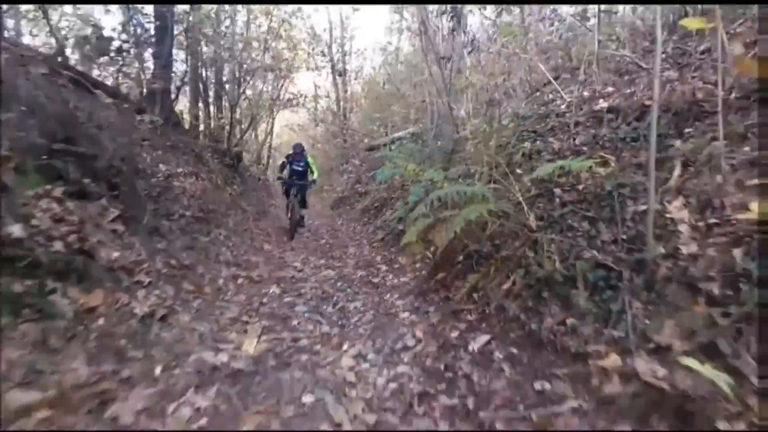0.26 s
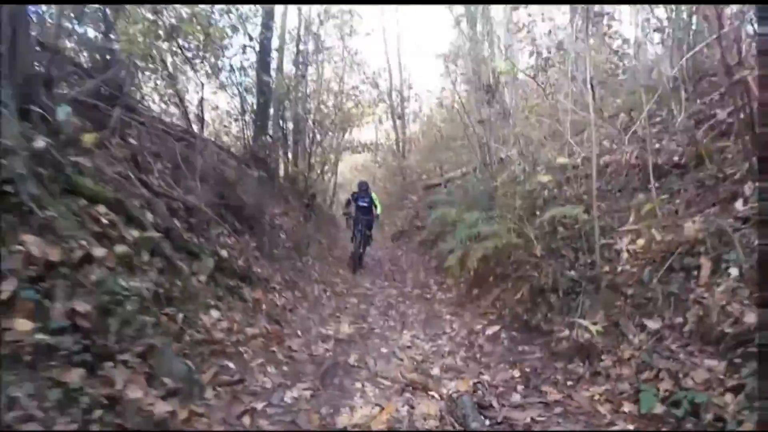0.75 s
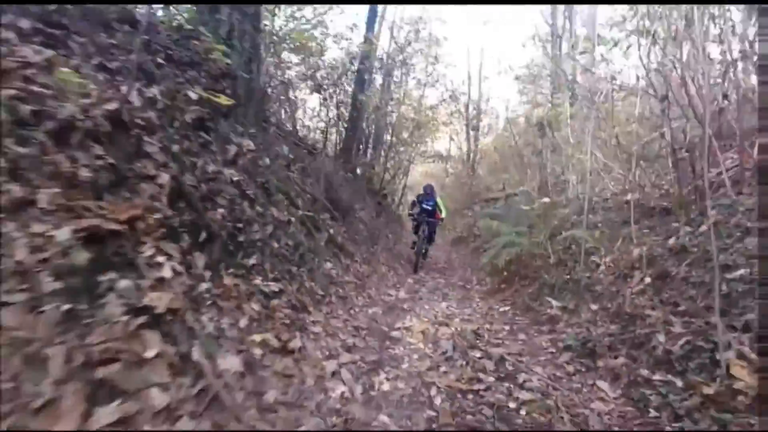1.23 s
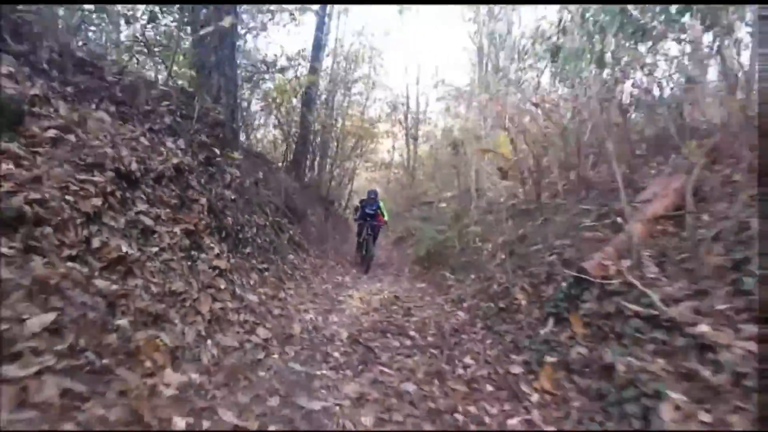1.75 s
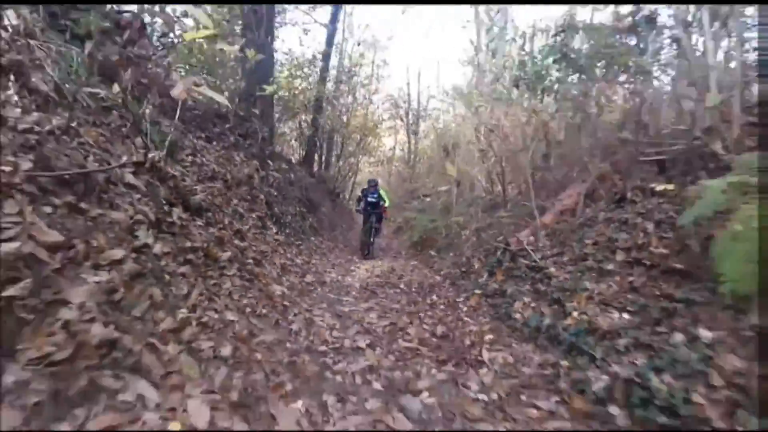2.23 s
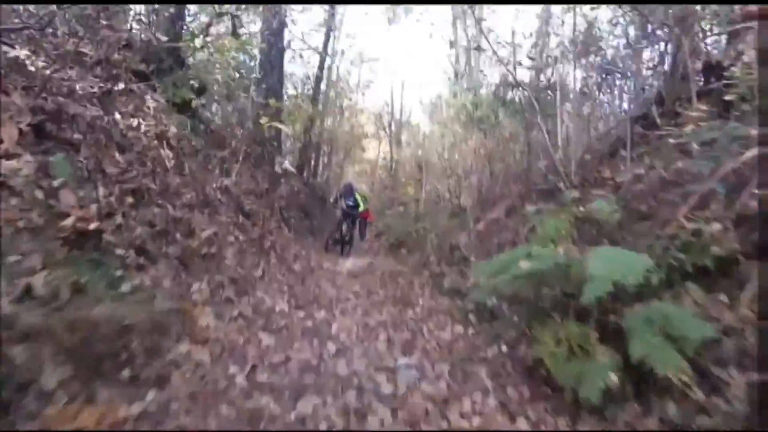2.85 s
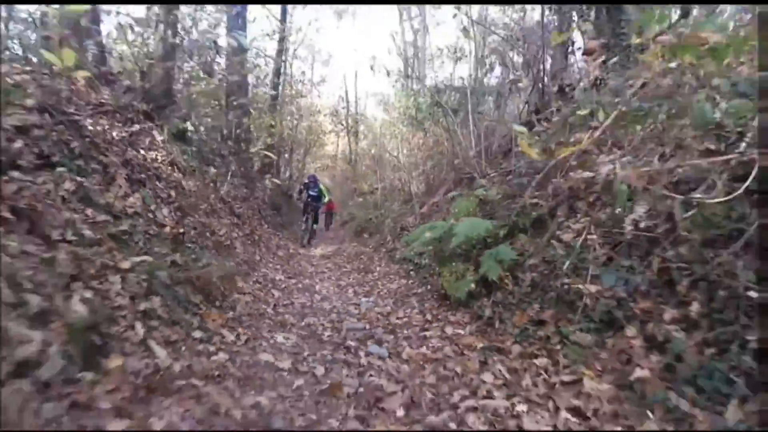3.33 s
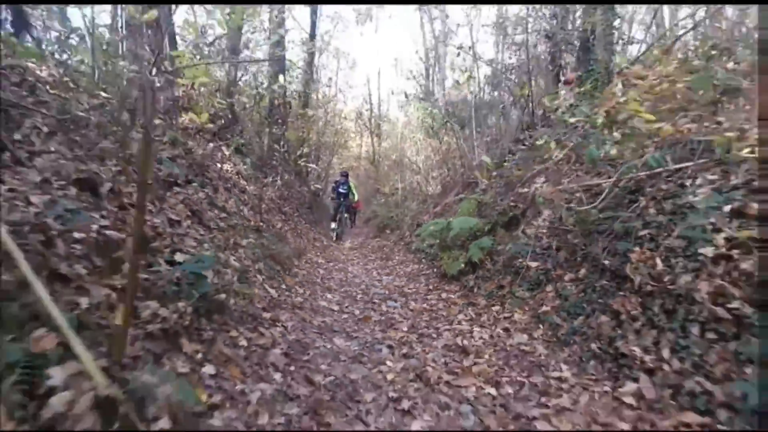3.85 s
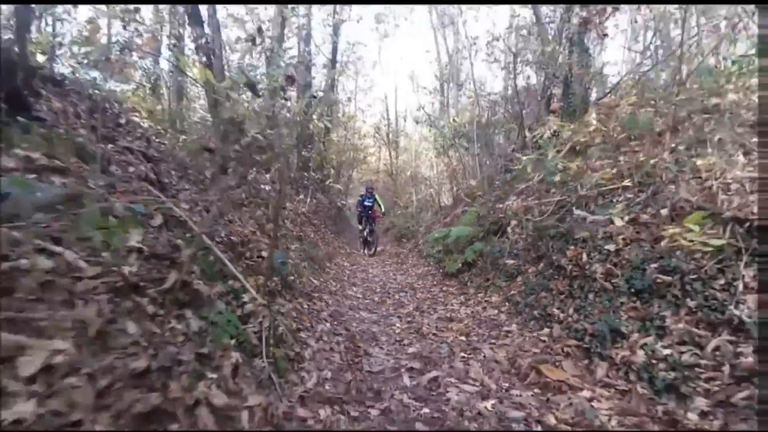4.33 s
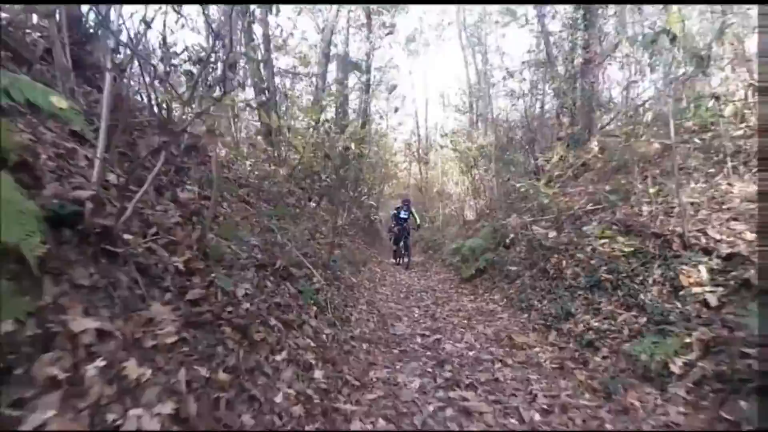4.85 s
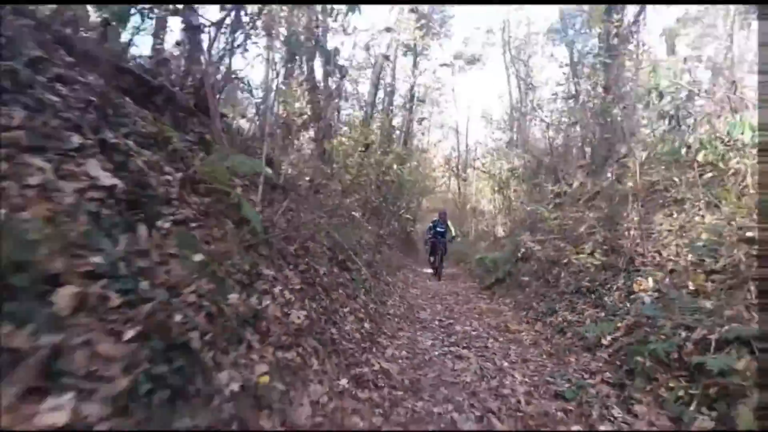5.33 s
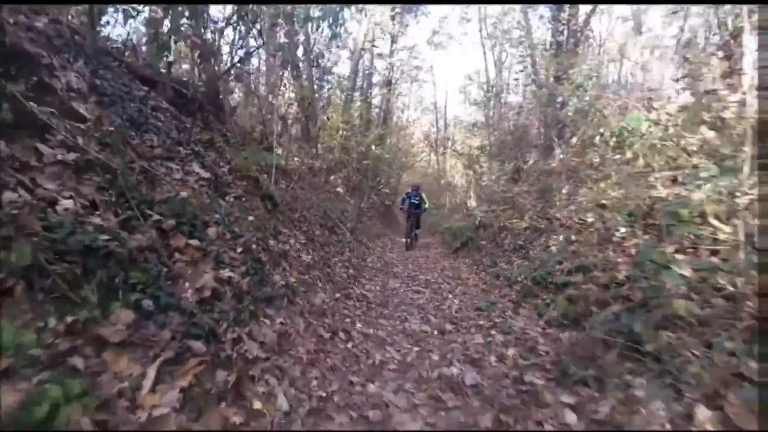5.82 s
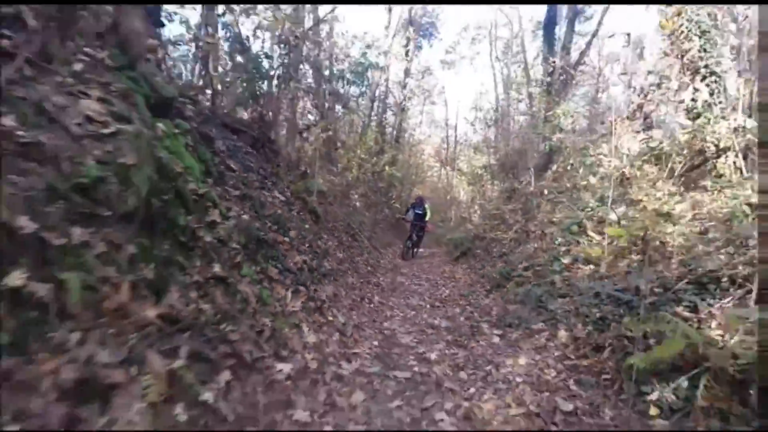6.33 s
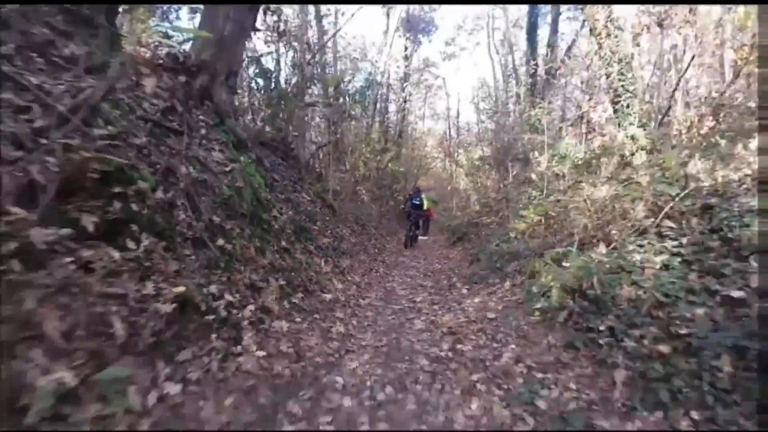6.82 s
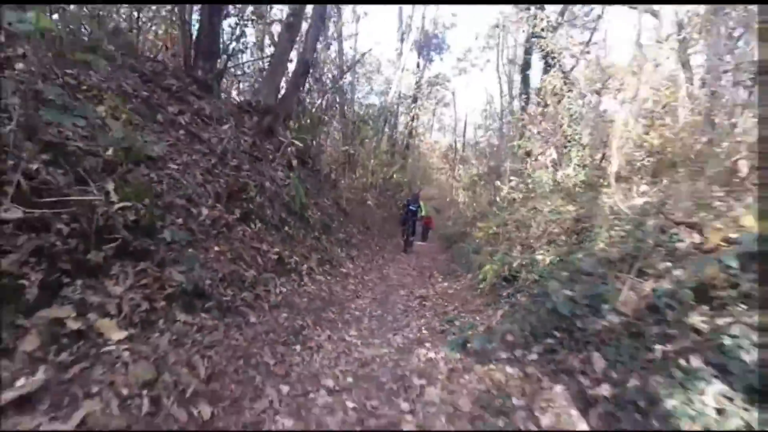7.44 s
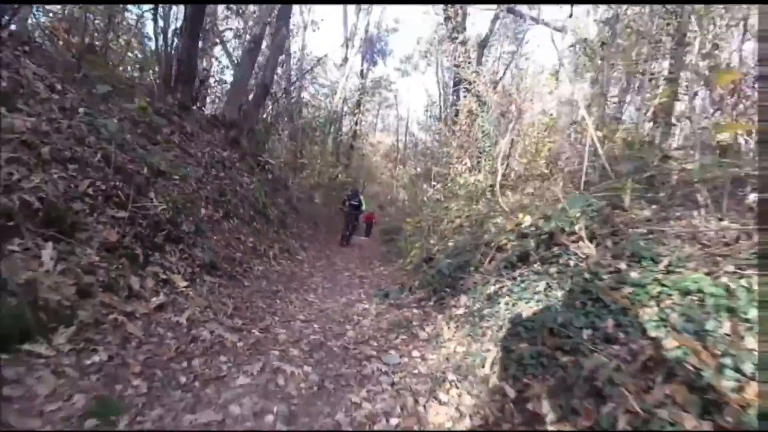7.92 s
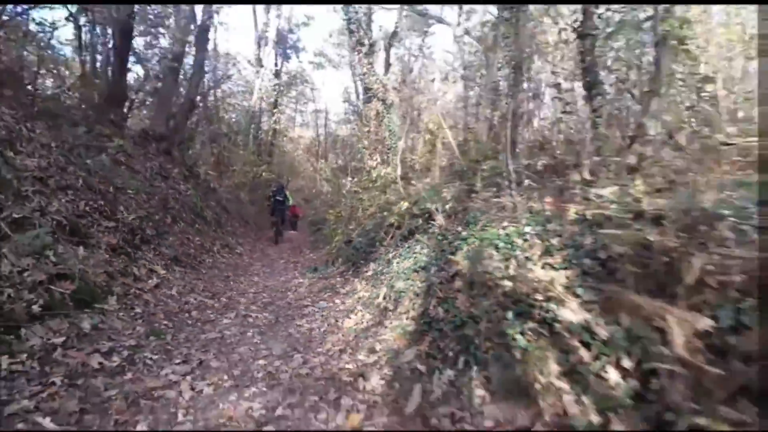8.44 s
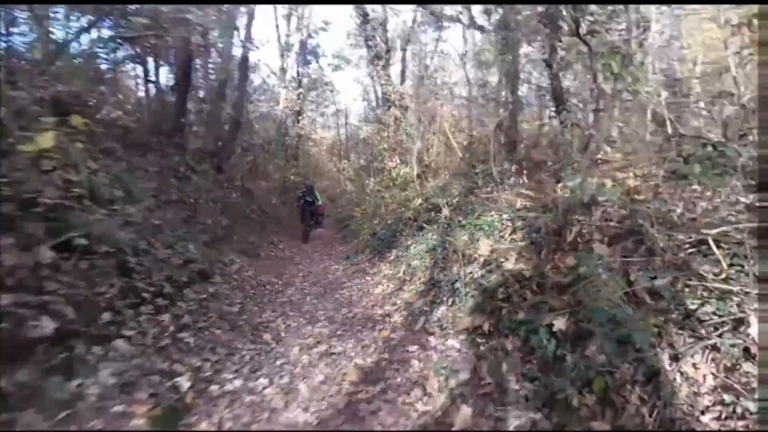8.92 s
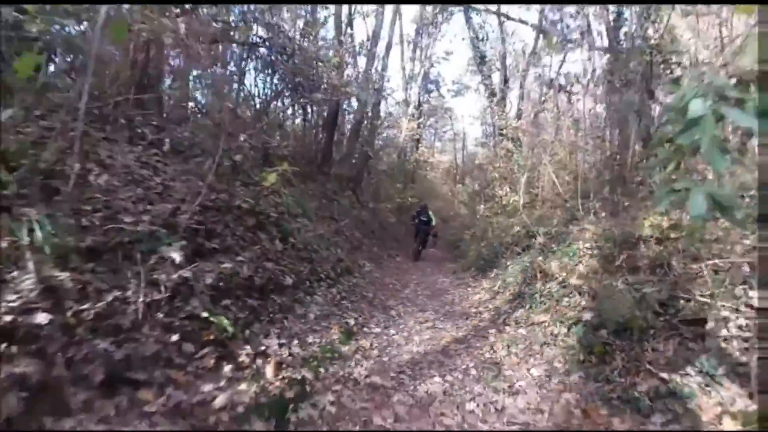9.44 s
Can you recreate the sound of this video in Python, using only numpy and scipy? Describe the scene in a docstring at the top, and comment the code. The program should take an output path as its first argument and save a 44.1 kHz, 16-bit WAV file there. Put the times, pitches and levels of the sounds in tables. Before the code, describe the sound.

Muffled wind buffets a boxed-in microphone on a bicycle while hollow plastic knocks rattle irregularly and tyres crackle faintly through dry leaves.

```python
"""A camera in a closed plastic housing rides a bicycle along a leafy dirt trail in a wood.
It opens on a strong gust, made of lumpy low noise, over a flurry of knocks, each a ring of housing modes.
Further gusts peak near 2.1 and 3 s while the tyres hiss and crackle, as banded noise and clicks, in the leaves.
The steady wind sinks near 4.5 s under two hard knocks; then a stem rattles past in six even noise cracks.
Knocks, sine wind pops, snaps and scratchy brushes go on over drifts of leaves; the hiss swells at the end."""
import sys
import numpy as np
from scipy import signal
from scipy.io import wavfile
from scipy.ndimage import uniform_filter1d

SR = 44100
rng = np.random.default_rng(int(sys.argv[2]) if len(sys.argv) > 2 else 0)


def to_wav(s):
    """Save 16-bit WAV."""
    ch = np.atleast_2d(s).T  # columns
    pcm = np.round(np.clip(ch, -1, 1) * 32767)  # PCM
    wavfile.write(sys.argv[1], SR, pcm.astype(np.int16))


N = 426447

# steady air flow between gusts: (time [s], level [dB])
STEADY_WIND = [(0.0, -27.5), (0.9, -30.5), (1.9, -29), (2.8, -29.5), (3.55, -33.5), (4.55, -41.5),
               (5.3, -30.5), (6.3, -32), (7.6, -30), (8.04, -31.5), (8.7, -29.5), (9.0, -32), (9.6, -28.5)]
# gusts that buffet the port: (time of peak [s], peak level [dB], time to fall 10 dB [s])
GUSTS = [(0.0, -14.5, 0.0834), (0.14, -18, 0.224), (0.7, -19.5, 0.0553), (1.06, -20, 0.14), (1.46, -18, .3),
         (1.63, -20, 0.047), (1.81, -20.5, 0.1532), (2.121, -16, 0.0938), (2.3, -18, .15), (2.4, -17, 0.11),
         (2.72, -25, 0.27), (3.04, -14.5, 0.062), (3.25, -20, 0.23), (3.77, -20.5, 0.3436),
         (4.34, -25.5, 0.0429), (4.71, -23.5, .15), (4.89, -21, 0.137), (5.09, -25, 0.1357),
         (5.66, -18, 0.0782), (5.8, -19.5, 0.026), (6.05, -24, 0.18), (6.49, -19, 0.14), (6.61, -21, 0.035),
         (6.86, -20, 0.06), (7.03, -24.5, 0.11), (7.36, -20.5, 0.3226), (8.17, -24, .25), (8.47, -28, 0.18),
         (8.93, -23.5, 0.07), (9.18, -27.5, 0.25)]
GUST_RISE_S = 0.0794  # time to rise the last 10 dB
# spectrum of the flow at the port, before its band-passes: (frequency [Hz], density [dB per Hz])
WIND_COLOUR = [(20, -30), (60, -12), (110, -6), (158, -0.5), (212, -5), (262, -1.5), (400, -5.5),
               (560, -7.5), (800, -19), (1050, -23), (1500, -53)]

# low wind pops: (time [s], nominal level [dB], starting pitch [Hz])
WIND_POPS = [(0.133, -9.5, 376), (1.042, -10.5, 424), (1.322, -14.5, 206.4), (2.716, -11.5, 259),
             (1.424, -12, 256), (1.458, -4.5, 372), (1.618, -6.5, 251), (2.241, -11, 383),
             (2.323, -12.5, 277), (3.659, -14, 651), (3.761, -11, 195.7), (3.868, -15, 712),
             (4.888, -12.5, 212), (5.631, -15.5, 331), (6.852, -19.5, 247), (7.354, -10.5, 262),
             (7.673, -19, 460), (8.681, -17.5, 273)]

# camera hitting its housing: (time [s], blow level [dB], hardness as level of the upper modes [dB])
KNOCKS = [(0.044, -15, -15), (0.065, -7.5, -8), (0.11, -24, -16), (0.179, -15, -16), (0.21, -13, -14.5),
          (0.284, -20.5, -10.5), (0.291, -11.5, -10.5), (0.33, -18.5, -11.5), (0.375, -21, -13.5),
          (0.424, -21, -17.5), (0.589, -23, -15.5), (0.597, -20.5, -14.5), (0.605, -18.5, -10.5),
          (0.63, -18.5, -10.5), (0.644, -20.5, -13.5), (0.656, -23, -14.5), (0.757, -19, -12.5),
          (0.788, -12.5, -13.5), (0.796, -13, -11), (0.804, -15.5, -11.5), (0.811, -18.5, -11.5),
          (0.838, -12.5, -12.5), (0.862, -20, -13.5), (0.93, -16, -8.5), (0.995, -24.5, -7.5),
          (1.151, -12.5, -13), (1.382, -23.5, -10.5), (1.454, -18.5, -13), (1.54, -24, -18),
          (1.579, -11, -6), (1.622, -10, -10.5), (1.659, -19.5, -6.5), (1.688, -17, -12.5),
          (1.696, -12.5, -9), (1.828, -15.5, -11.5), (2.164, -13.5, -10.5), (2.234, -22, -12),
          (2.858, -27, -8), (2.91, -25, -14.5), (2.94, -22.5, -15.5), (2.969, -21.5, -12),
          (3.009, -19.5, -8), (3.08, -12.5, -6), (3.14, -23.5, -13.5), (3.216, -17.5, -7),
          (3.221, -19.5, -10.5), (3.258, -17.5, -8.5), (3.669, -17, -19), (3.747, -15.5, -14),
          (3.965, -16, -14), (4.41, -11, -15), (4.478, -6.5, -10), (4.732, -22.5, -11.5),
          (5.014, -15.5, -13.5), (5.096, -18, -18), (5.239, -15, -15), (5.375, -13.5, -13.5),
          (5.383, -15, -14.5), (5.391, -19.5, -18), (5.431, -11.5, -10.5), (5.556, -23.5, -13.5),
          (5.6, -18.5, -16.5), (5.878, -19.5, -12.5), (5.913, -25, -9), (5.964, -19.5, -17),
          (6.064, -10.5, -5), (6.157, -22, -15.5), (6.256, -13.5, -12), (6.301, -15.5, -11.5),
          (6.31, -15.5, -10.5), (6.481, -15.5, -16), (6.537, -23, -13.5), (6.544, -18, -11),
          (6.608, -21.5, -19), (6.63, -20.5, -23.5), (6.68, -14.5, -4.5), (6.745, -9, -12),
          (6.754, -14, -10), (6.916, -14, -6), (7.141, -10, -11), (7.157, -11, -10.5), (7.169, -21, -8.5),
          (7.303, -18, -14.5), (7.35, -23, -15), (7.408, -24, -14.5), (7.484, -10.5, -5.5),
          (7.556, -22.5, -10.5), (7.711, -10.5, -10.5), (7.767, -17.5, -12), (7.902, -27.5, -14.5),
          (7.945, -10.5, -15), (8.206, -14, -15.5), (8.58, -22, -17.5), (8.594, -21, -7.5),
          (8.853, -12, -12), (8.917, -7, -11.5), (9.154, -19.5, -13.5), (9.213, -26, -14.5),
          (9.402, -9.5, -10), (9.415, -13, -10.5), (9.514, -13, -8)]
# low modes of the housing: (nominal frequency [Hz], level [dB], time to peak [s])
BODY_MODES = [(520, -9, .0018), (780, -4.5, .0021), (1315.6, 0, .0026)]
# upper modes of the housing: (nominal frequency [Hz], level [dB], time to peak [s])
SHELL_MODES = [(1907, -12, 0.00089), (2619, -5, 0.000946), (3038, -8, .0007), (3400, -10.5, .0007),
               (3770, -5, 0.00083), (4333, -13.5, 0.0007), (5216, -17, 0.0007), (5900, -23, 0.0006),
               (7250, -39, 0.0007), (8700, -43, 0.0004)]
# side panel that light, soft blows wake most: (frequency [Hz], base level [dB], time to peak [s])
SIDE_MODES = [(2240, -19, .0018)]
SIDE_PER_DB = 0.5  # dB the panel gains for each dB of lighter or softer blow
LEAD_S = 0.0006  # a blow begins this long before its listed time, where its front is sharp
REBOUND_S, REBOUND_DB = 0.0034, -13  # each blow bounces once, this long after its listed time
# bright treble bursts on some knocks: (time [s], starting level before the band-pass [dB])
KNOCK_BURSTS = [(1.578, -48), (3.079, -52.5), (6.0627, -47), (6.6793, -47.5), (8.9168, -43)]

# twigs and grit that snap or flick the frame: (time [s], peak level [dB], centre pitch [Hz])
SNAPS = [(0.382, -30, 3080), (0.674, -28.5, 3480), (1.248, -28.5, 2460), (1.401, -29.5, 2590),
         (1.467, -29.5, 4000), (2.534, -28, 3690), (3.663, -30.5, 2390), (4.991, -24.5, 2197),
         (5.187, -30.5, 3770), (5.736, -28.5, 2800), (6.785, -28.5, 2440), (8.003, -30.5, 2100),
         (8.568, -26, 1495), (9.092, -26, 1804)]
# a stem rattling past in even cracks: start [s], spacing [s], peak level [dB], centre pitch [Hz], count
RASP_S, RASP_GAP_S, RASP_DB, RASP_HZ, RASP_COUNT = 4.9595, 0.006, -25.5, 2000, 6

# steady rolling hiss of the tyres in the leaves, 1.7-6 kHz: (time [s], level [dB])
STEADY_LEAVES = [(0, -47.5), (.3, -46.5), (.45, -53.5), (.9, -56.5), (1.3, -50), (2.4, -50), (3.0, -49),
                 (3.55, -54), (4.0, -48.5), (4.8, -49.5), (5.3, -52), (6.2, -54.5), (6.4, -49.5),
                 (7.0, -51), (8.2, -52.5), (8.5, -56.5), (9.35, -56.5), (9.67, -47.5)]
# deeper drifts that the wheels plough through: (time of peak [s], peak level [dB], time to fall 10 dB [s])
DRIFTS = [(.62, -42.5, 0.13), (.81, -46.5, .07), (1.04, -41.5, 0.3847), (1.5, -47.5, 0.34),
          (1.66, -42.5, 0.02), (1.9, -46.5, 0.21), (2.53, -44, 0.19), (4.99, -45.5, 0.24),
          (5.23, -46, 0.0549), (5.64, -46.5, 0.39), (7.33, -46, 0.06), (7.74, -46.5, 0.09),
          (8.57, -46.5, 0.14), (8.94, -47.5, 0.04), (9.11, -45, 0.07), (9.49, -42.5, 0.18)]
DRIFT_RISE_S = 0.12  # time to rise the last 10 dB
# spectrum of the leaves through the housing: (frequency [Hz], density [dB per Hz])
LEAF_COLOUR = [(450, -19.5), (780, -3), (1050, -6), (1350, 0), (1750, -8), (2250, -11), (2420, -11),
               (2680, -11), (3300, -19.5), (3750, -14), (4400, -24.5), (5050, -25.5), (6400, -38.5),
               (8400, -63)]

# leaves or a strap brushing past: (time [s], length [s], level before muffling [dB], centre [Hz])
BRUSHES = [(1.017, 0.0108, -38, 2400), (2.504, 0.0546, -45.5, 2600), (2.694, 0.0406, -46, 3400),
           (4.905, 0.0314, -39, 1800), (6.969, 0.0137, -38.5, 2200), (8.54, 0.0186, -35, 1750),
           (8.909, 0.0382, -41, 3300), (8.719, 0.0416, -45, 3100), (9.43, 0.052, -42.5, 1600),
           (9.476, 0.044, -37, 1800)]

AIR_DB = -85  # level of the faint airy hiss while the rustle's treble stands at -56 dB
EDGE_HZ = 15700


def wind():
    """Eddies burst on the port: lumpy low noise that brightens in gusts."""
    level_db = swelling(STEADY_WIND, GUSTS, GUST_RISE_S)
    turbulence = evened(rng.standard_normal(N) * gain_of(2.977 * lumps(size=500)))
    bursts = evened(sparse(per_s=250, spread_db=3.94))
    flow = coloured(turbulence + 0.662 * bursts, WIND_COLOUR)

    # the port hums at a wandering pitch
    hum_hz = 245 * gain_of(1.64 * lumps(size=4000))
    hum = evened(moan(flow, hum_hz, width_hz=39))
    body = evened(evened(band(flow, 36, 329)) + 0.256 * hum)

    bright_db = -8 + 0.52 * (level_db + 20.5) + 1.4 * lumps(size=2000)
    bright = gain_of(bright_db) * evened(band(flow, 239.5, 900))
    return gain_of(level_db) * (body + bright)


def wind_pops():
    """Low wind pops: a few sine cycles that swell, die and slide down in pitch."""
    out = np.zeros(N)
    for s, db, hz in WIND_POPS:
        turns = np.arange(0, 4, hz / SR)
        swell = turns / 0.27 * np.exp(1 - turns / 0.369)
        pop = swell * np.sin(2 * np.pi * turns * (1 - 0.056 * turns))
        add(out, s, -gain_of(db) * pop)
    return band(out, 63, 3000)


def knocks():
    """The camera hits its housing; every blow lands elsewhere and wakes other upper modes."""
    out, low, t = np.zeros(N), len(BODY_MODES), np.arange(900) / SR
    scatter = rng.standard_normal((len(KNOCKS), 3, len(BODY_MODES + SHELL_MODES)))
    # panels shiver on, dying 60 dB in 21 ms
    shivers = rng.standard_normal((len(KNOCKS), len(t))) * gain_of(-60 * t / 0.021)
    for (s, db, hard_db), (pitch, share, phase), shiver in zip(KNOCKS, scatter, shivers):
        body = ring(BODY_MODES, 1 + 0.018 * pitch[:low], 0.6 * share[:low], sharpness=4.5)
        side_db = -SIDE_PER_DB * (db + hard_db + 28) + 3.0 * phase[0]
        side = gain_of(side_db) * ring(SIDE_MODES, 1, 0, sharpness=2.5)
        shell = ring(SHELL_MODES, 1 + 0.015 * pitch[low:], 1.8 * share[low:], 1.6, 2 * phase[low:])
        blow = body + side + gain_of(hard_db) * shell
        buzz = band(shiver, 700, 4300)
        buzz /= np.linalg.norm(buzz)
        blow += gain_of(-19) * signal.fftconvolve(blow, buzz)[:len(t)]
        add(out, s - LEAD_S, gain_of(db) * blow)
        add(out, s + REBOUND_S, gain_of(db + REBOUND_DB) * blow)
    return out + loose_taps() + flying_grit()


def loose_taps():
    """Light loose taps: random clicks ring all the housing modes."""
    tap = ring(BODY_MODES + SIDE_MODES, 1, 0, sharpness=4.5)
    tap += gain_of(-9) * ring(SHELL_MODES, 0.99, 0, sharpness=1.6)
    return gain_of(-49.5) * signal.oaconvolve(sparse(per_s=80, spread_db=4.01), tap)[:N]


def flying_grit():
    """Grit pings the upper modes, more of it in deep leaves."""
    out = np.zeros(N)
    thick = gain_of(swelling(STEADY_LEAVES, DRIFTS, DRIFT_RISE_S) + 49)
    # four kinds of ping, each with its own phases
    for phase in rng.uniform(0, 2 * np.pi, (4, len(SHELL_MODES))):
        ping = ring(SHELL_MODES, 0.9854, 0, 1.0, phase)
        hits = sparse(per_s=9.0 * thick, spread_db=3.5)
        out += gain_of(-48.5) * signal.oaconvolve(hits, ping)[:N]
    return out


def knock_bursts():
    """Bright treble bursts on some knocks: short noise that dies 60 dB in 6.5 ms."""
    out, t = np.zeros(N), np.arange(600) / SR
    for s, db in KNOCK_BURSTS:
        burst = gain_of(db - 60 * t / 0.0065) * rng.standard_normal(len(t))
        add(out, s, band(burst, 4300, 13000))
    return out


def snaps():
    """Twigs, grit and the stem crack: short noise bursts, each around its own pitch."""
    out, t = np.zeros(N), np.arange(600) / SR
    rasp = [(RASP_S + k * RASP_GAP_S, RASP_DB, RASP_HZ) for k in range(RASP_COUNT)]
    for s, db, hz in SNAPS + rasp:
        grit = rng.standard_normal(len(t))
        grit[0] += 8  # sharp front
        burst = grit * gain_of(-60 * t / 0.008)
        crack = band(band(burst, 0.6 * hz, 1.4 * hz), 0.5 * hz, 1.5 * hz)
        add(out, s, gain_of(db) * crack / abs(crack).max())
    return out


def leaves():
    """Rustle of many leaves: each pitch region swells in its own clumps and has its own crackles."""
    together_db, rustle = 2.7 * lumps(size=700), 0
    for hz in np.geomspace(600, 8000, num=9):
        clumps = gain_of(together_db + 2.1 * lumps(size=700))
        crush = rng.standard_normal(200) * np.exp(-np.arange(200) / 140.0)
        crackle = signal.oaconvolve(sparse(60 * clumps, spread_db=4.3), crush)[:N]
        grain = evened(rng.standard_normal(N) * clumps) + 0.69 * evened(crackle)
        # wider regions carry more power
        rustle = rustle + np.sqrt(hz) * evened(band(grain, hz / 1.25, hz * 1.25))
    heard = coloured(rustle, LEAF_COLOUR)
    heard /= np.std(band(heard, 1700, 6000))
    return gain_of(swelling(STEADY_LEAVES, DRIFTS, DRIFT_RISE_S)) * heard


def brushes():
    """Leaves or a strap drag past: dense scratchy noise bursts in a narrow band."""
    out = np.zeros(N)
    scratch = coloured(rng.standard_normal(N) * gain_of(3.0 * lumps(size=60)), LEAF_COLOUR)
    for s, length, db, hz in BRUSHES:
        part = scratch[round(s * SR):][:round(length * SR)]
        stroke = evened(band(band(part, 0.717 * hz, 1.35 * hz), 0.74 * hz, 1.4 * hz))
        add(out, s, gain_of(db) * stroke * signal.windows.tukey(len(part), 0.2))
    return out


def air(rustle):
    """Faint airy treble noise that breathes with the rustle, half a dB for each dB."""
    power = uniform_filter1d(band(rustle, 3000, 6000) ** 2, size=300)
    rustle_db = 10 * np.log10(abs(power) + 1e-12)
    hiss = evened(band(rng.standard_normal(N), 5200, 9500))
    return gain_of(AIR_DB + 0.5 * (rustle_db + 56)) * hiss


def gain_of(db):
    """Decibels to gain."""
    return 10 ** (np.asarray(db) / 20)


def evened(x):
    """Scales to rms 1."""
    return x / np.sqrt(np.mean(x ** 2) + 1e-20)


def add(mix, s, sound):
    """Mixes a sound in at a time in seconds."""
    part = mix[max(round(s * SR), 0):][:len(sound)]
    part += sound[:len(part)]


def band(x, low_hz, high_hz):
    """Band-pass."""
    edges = [low_hz, min(high_hz, SR / 2.2)]
    return signal.sosfilt(signal.butter(2, edges, "band", fs=SR, output="sos"), x)


def coloured(x, points):
    """Causal minimum-phase filter with the given spectrum, so clicks keep a sharp front; rms 1."""
    f, db = np.transpose(points)
    hz = abs(np.fft.fftfreq(8192, 1 / SR))
    spectrum_db = np.interp(np.log(hz + 1), np.log(f + 1), np.maximum(db, -90))
    log_gain = np.log(gain_of(spectrum_db))
    phase = -signal.hilbert(log_gain).imag
    taps = np.fft.ifft(np.exp(log_gain + 1j * phase)).real[:4096]
    return evened(signal.oaconvolve(x, taps)[:N])


def lumps(size):
    """Smooth random curve of rms 1 that changes over about size samples."""
    return evened(uniform_filter1d(uniform_filter1d(rng.standard_normal(N), size), size))


def sparse(per_s, spread_db):
    """Random clicks of either sign, most small, a few large."""
    height_db = spread_db * np.minimum(rng.exponential(1, N), 4)
    heights = gain_of(height_db) * rng.choice([-1., 1.], N)
    return heights * (rng.random(N) < per_s / SR)


def swelling(steady, swells, rise_s):
    """Level in dB: a slow curve plus swells that rise and die away exponentially."""
    t = np.arange(N) / SR
    times, levels_db = np.transpose(steady)
    power = gain_of(np.interp(t, times, levels_db)) ** 2
    for s, db, fall_s in swells:
        drop_db = 10 * np.maximum((s - t) / rise_s, (t - s) / fall_s)
        power += gain_of(db - drop_db) ** 2
    return 10 * np.log10(power)


def ring(modes, detune, uneven_db, sharpness, phase=0):
    """One blow into the modes, each a sine swelling to its peak and dying."""
    hz, db, peak = np.transpose(modes)[:, :, None]
    t = np.arange(900) / SR
    swell = (t / peak * np.exp(1 - t / peak)) ** sharpness
    turn = 2 * np.pi * hz * np.reshape(detune, (-1, 1)) * t + np.reshape(phase, (-1, 1))
    gain = gain_of(db + np.reshape(uneven_db, (-1, 1)))
    return -(gain * swell * np.sin(turn)).sum(0)


def moan(x, hz, width_hz):
    """Resonance that follows the curve hz: shift down to 0 Hz, smooth, shift back."""
    turn = np.exp(2j * np.pi * np.cumsum(hz) / SR)
    r = np.exp(-np.pi * width_hz / SR)
    return 2 * (turn * signal.lfilter([1 - r], [1, -r], x / turn)).real


def scene():
    """All sources at the one microphone; the scratches and wind pops are dulled above 6 kHz."""
    lowpass = signal.butter(6, 6000, fs=SR, output="sos")
    muffled = signal.sosfilt(lowpass, wind_pops() + brushes())
    rustle = leaves()
    return (wind() + knocks() + knock_bursts() + snaps() + rustle + muffled + air(rustle))[None]


def record(dry):
    """Steep low-pass that ends the treble at EDGE_HZ."""
    taps = signal.firwin(511, EDGE_HZ, window=("kaiser", 9), fs=SR)
    return signal.oaconvolve(dry, taps[None], "same")


dry = scene()
out = record(dry)
to_wav(out)
```